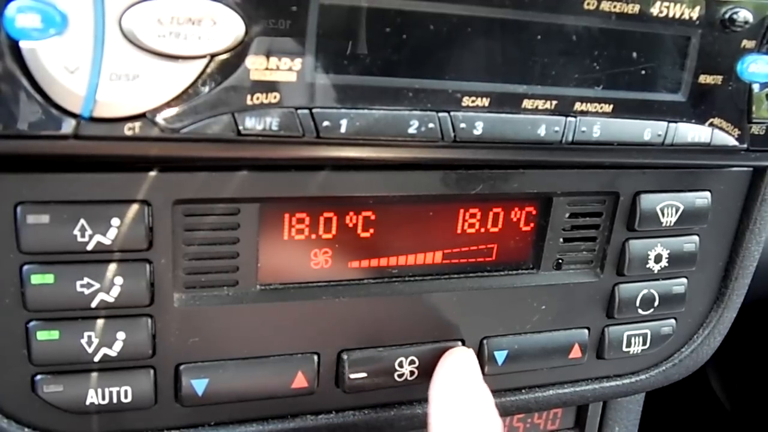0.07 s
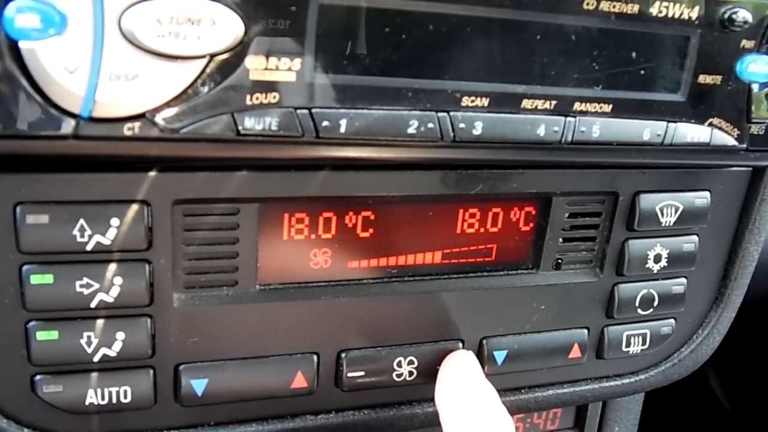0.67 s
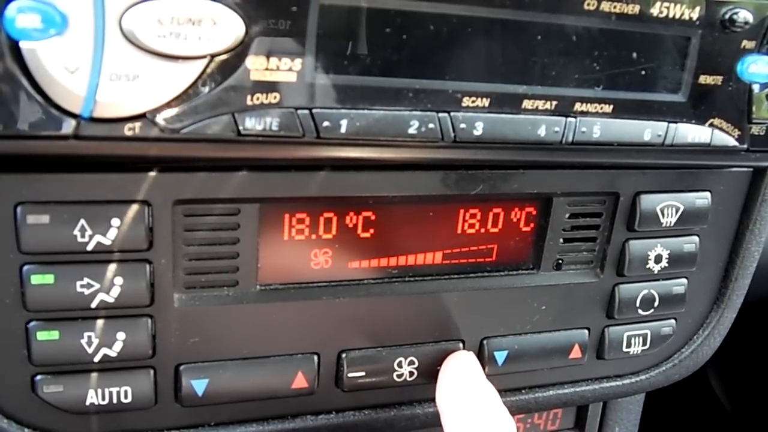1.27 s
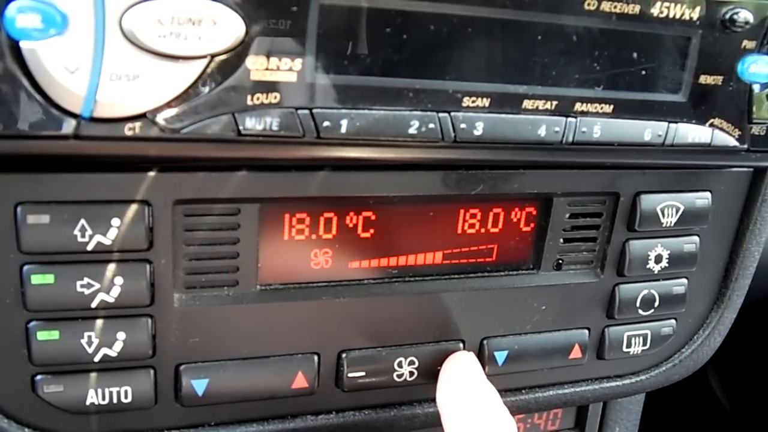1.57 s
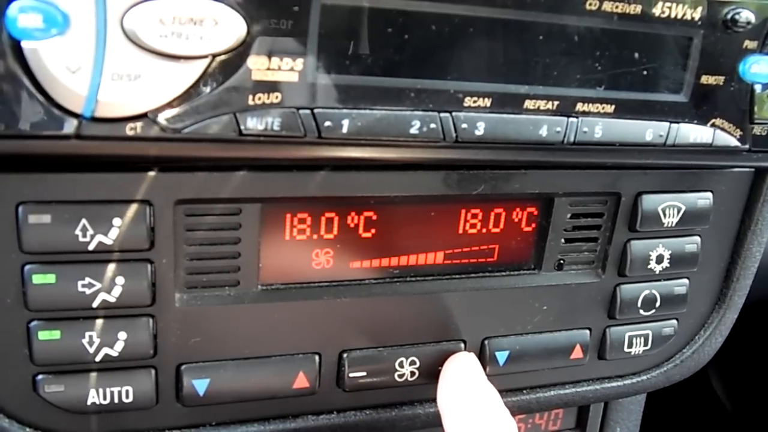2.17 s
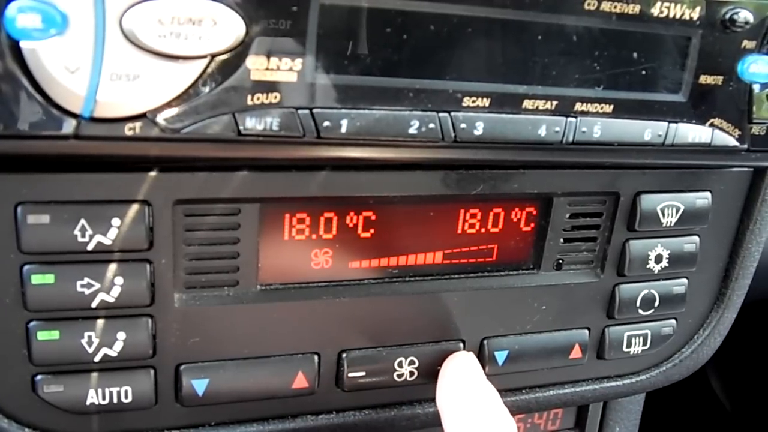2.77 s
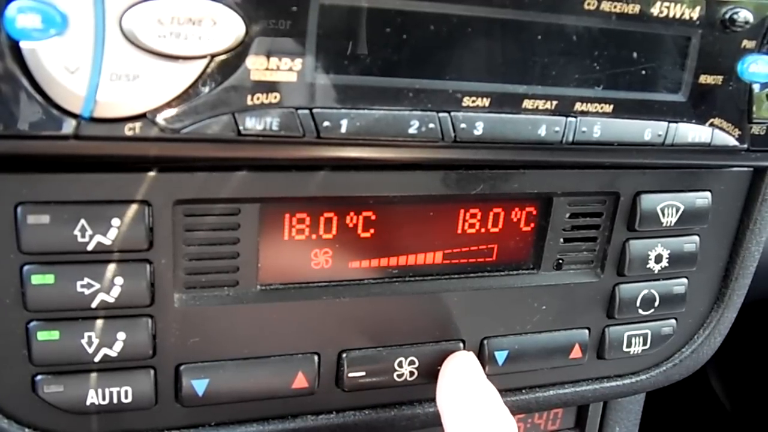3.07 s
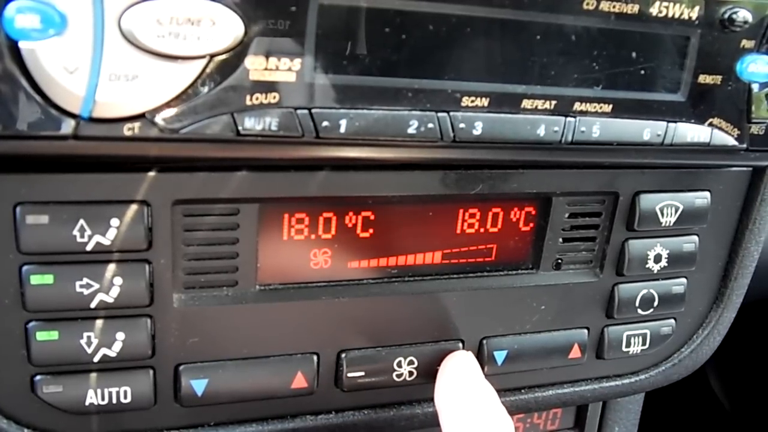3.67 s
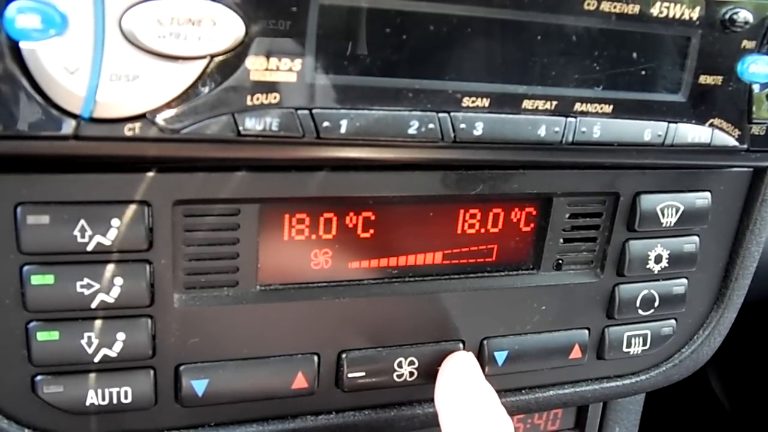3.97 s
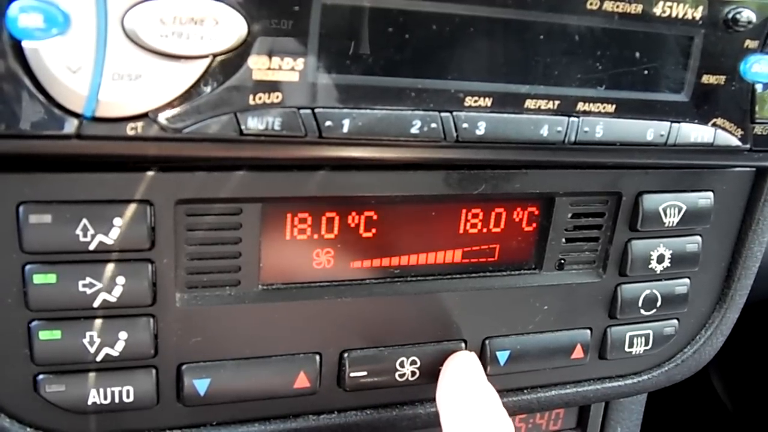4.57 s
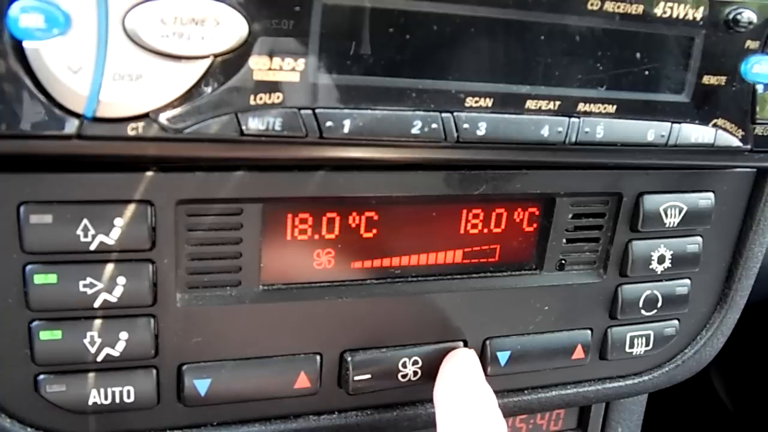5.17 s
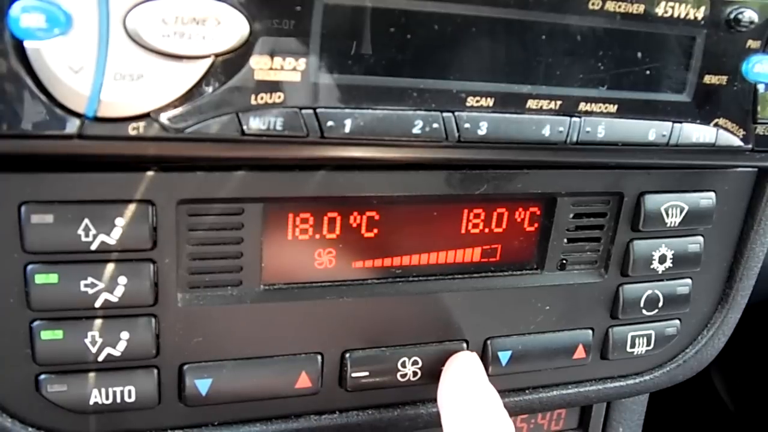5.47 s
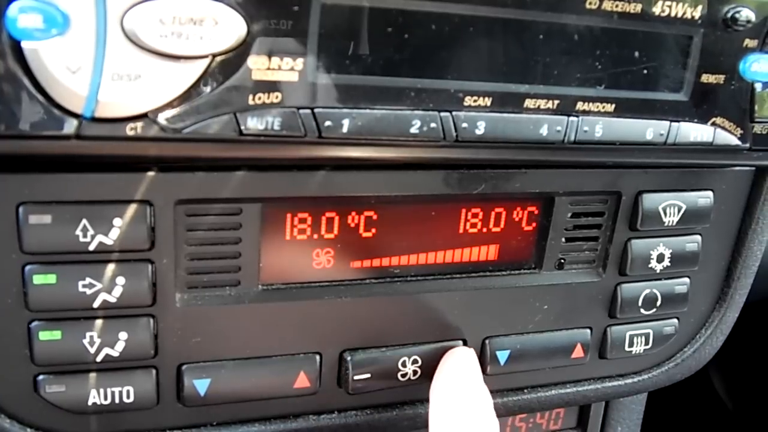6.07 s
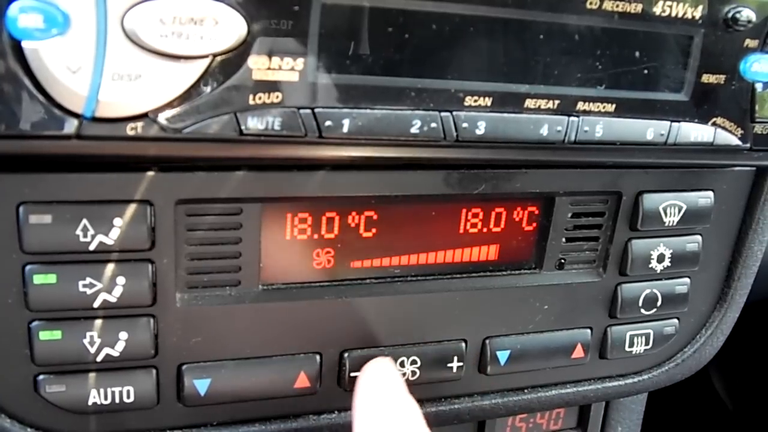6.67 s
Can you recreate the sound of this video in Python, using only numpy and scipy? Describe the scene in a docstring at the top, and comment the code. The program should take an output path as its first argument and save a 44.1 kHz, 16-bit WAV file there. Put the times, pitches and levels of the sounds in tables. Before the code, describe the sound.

A car's blower fan runs throughout, a steady, slightly hollow rush of air from the dashboard vents, heard close up in the cabin. A low rumble lies underneath, and the draught buffets the microphone with irregular soft thumps and flutter, mostly on the right. A small plastic button clicks down and up right at the start, at 0 and 0.2 seconds. One sharp, high plastic tick comes at about 1.9 seconds. From around 3.5 seconds a very faint fan tone sits in the air noise, rising slightly. The button is pressed and released three more times, at about 4.4, 5.2 and 6.1 seconds, each a pair of short, light clicks. Toward the end the air becomes a little thinner and hissier, and it keeps blowing and buffeting until the sound ends at nearly 7 seconds.

```python
"""Car blower stepped up

Inside a car a finger steps up the blower on the climate panel, close to a handheld camera.
Turbulent air from the vents excites the resonances of ducts and cabin, and the fan's faint blade
tone rises with its speed. The jet buffets the right microphone port over a low rumble.
The rocker button clicks, and a bit of hard plastic ticks once: impacts that ring damped modes."""
import sys
import numpy as np
from scipy import signal
from scipy.fft import rfft, irfft
from scipy.io import wavfile
from scipy.ndimage import uniform_filter1d

SR = 44100
rng = np.random.default_rng(int(sys.argv[2]) if len(sys.argv) > 2 else 0)


def transcribe(signal):
    """Save signal, clipped to [-1, 1], as a 16-bit WAV file at the path in sys.argv[1]."""
    frames = np.atleast_2d(signal).T
    limited = np.clip(frames, -1, 1)
    pcm = np.round(limited * 32767).astype(np.int16)
    wavfile.write(sys.argv[1], SR, pcm)


N = 300762
TIME = np.arange(N) / SR
FREQ = np.maximum(np.arange(N // 2 + 1) * SR / N, 1)


def undb(db):
    """Amplitude ratio of a level in decibels."""
    return 10 ** (np.asarray(db) / 20)


def curves(table):
    """Linear interpolation of each column of a time table."""
    times, *columns = np.transpose(table)
    return [np.interp(TIME, times, column) for column in columns]


def add(track, onset_s, sound):
    """Superposition of a short sound on a track."""
    start = int(onset_s * SR)
    a, b = max(start, 0), min(start + sound.shape[-1], N)
    if b > a:
        track[..., a:b] += sound[..., a - start:b - start]


def wander(rate_hz):
    """Sample-and-hold noise, smoothed twice; its standard deviation is near 1."""
    hold = int(SR / rate_hz)
    steps = rng.standard_normal(N)[np.arange(N) // hold]
    return 1.18 * uniform_filter1d(uniform_filter1d(steps, hold), hold)


def decay(t, t60):
    """Exponential damping: 60 dB in t60 seconds."""
    return np.exp(-np.log(1000) * t / t60)


def port_noise(spectrum, lift_db=0, lag_ms=0):
    """Partial coherence: two ports share part of a coloured noise, which may reach the right later."""
    hz, *columns = np.transpose(spectrum)
    left_db, right_db, coherence = (np.interp(np.log(FREQ), np.log(hz), c) for c in columns)
    coherence = np.clip(coherence, 0, 1)
    shared, own = rfft(rng.standard_normal((2, N))) * np.sqrt(SR / 2)
    delay = np.exp(-2j * np.pi * FREQ * lag_ms / 1000)
    right = coherence * shared * delay + np.sqrt(1 - coherence ** 2) * own
    return irfft(np.array([shared, right]) * undb(np.array([left_db, right_db]) + lift_db), N)


# Spectrum of the rushing air: f/Hz, left level/dB, right level/dB, coherence (0-1)
RUSH_SPECTRUM = [(200, -89.5, -89.5, 0.73), (622, -100, -98, 0.88), (955, -99.5, -93.5, 0.26),
                 (1720, -97.5, -94.5, 0.97), (2170, -99, -96.5, 0.17), (2430, -99, -96, 0.87),
                 (3046, -102, -104, 0.07), (4200, -108, -109.5, 0.4), (4850, -108, -113, 0),
                 (6200, -111, -114, 0.07), (7730, -111, -115.5, 0.26), (8530, -116, -117.3, .05),
                 (9700, -117, -117.5, 0.9)]
# Standing waves of ducts and cabin:
# f/Hz, bandwidth/Hz, left gain/dB, right gain/dB, further gain at full fan speed/dB
CABIN_MODES = [(406, 110, 7.5, 3.5, 0), (515, 70, 7.5, 1, 0), (680, 110, 6.5, 7, -2.5),
               (774, 68, 8.5, 2, -1), (900, 80, 6.5, 2, 2), (978, 56, 6, 4.5, 2.5), (1037, 70, 9, -1, 0),
               (1110, 80, 2.5, 5, 0), (1180, 75, 10, 0, 0), (1280, 110, 1.5, 0, -4), (1345, 60, 7, -1, 1.5),
               (1415, 70, 5.5, 3, 2.5), (1520, 85, 7.5, 5, 0), (1610, 90, 7, 4, 0), (1730, 110, 3.5, 7, 0),
               (1830, 60, 4, 2, 1), (1920, 90, 1, -1, 2.5), (2070, 140, -1, 0, 0), (2230, 60, 2, 0, 0),
               (2450, 120, 8.5, 6, 0), (2570, 110, 0, 3, 1), (2700, 90, 4, 1.5, 0),
               (2795, 60, -2.5, -3, 1.5), (2950, 100, 1.5, 0, 1.5), (3340, 130, -1, -1.5, 0),
               (3500, 160, 2.5, 1.5, 3), (4750, 500, 1.5, 0, -1), (5550, 150, 2, 1, 0),
               (6450, 150, 3, 0, 0), (7000, 140, 2.5, 1, 0), (9850, 160, 2, 0, 0)]


def vent_rush(blade_hz, hiss_db, roar_db, split_hz=600, flutter_db=0.43):
    """Resonance: broadband turbulence is coloured by the standing waves of ducts and cabin."""
    left_db, right_db, further_db = sum(
        np.outer(gains_db, np.exp(-np.log(2) * (2 * (FREQ - hz) / width) ** 2))
        for hz, width, *gains_db in CABIN_MODES)
    slow_air = port_noise(RUSH_SPECTRUM, np.array([left_db, right_db]), lag_ms=0.075)
    fast_air = irfft(rfft(slow_air) * undb(further_db), N)
    fast_share = (blade_hz / blade_hz.max()) ** 22  # comes in steeply near full speed
    air = (1 - fast_share) * slow_air + fast_share * fast_air
    roar = irfft(rfft(air) / (1 + (FREQ / split_hz) ** 8), N)
    hiss = air - roar
    return roar * undb(roar_db + flutter_db * wander(14)) + hiss * undb(hiss_db + flutter_db * wander(7.4))


def blade_tone(blade_hz, level_db, third_db=-10, right_db=-1, waver_db=1.5, wobble=0.0012):
    """Periodic forcing: the blades sound a thin tone at their passing rate, and its third harmonic."""
    phase = 2 * np.pi * np.cumsum(blade_hz * (1 + wobble * wander(14))) / SR
    fundamental = np.sin(phase) * undb(waver_db * wander(12))
    third = np.sin(3 * phase) * undb(third_db + waver_db * wander(5.9))
    return np.sqrt(2) * np.outer(undb([0, right_db]), (fundamental + third) * undb(level_db))


# Course of the fan: t/s, blade-passing f/Hz, vent hiss gain/dB, duct roar gain/dB, tone level/dB
FAN_COURSE = [(0, 405, -1.5, -2, -80), (.5, 421, -1, 0, -77), (1.8, 438, 0.24, 2.5, -80),
              (3.1, 447, 0, .8, -78), (3.5, 449.5, 0.5, 2.1, -71.3), (4.5, 457, 0.7, .3, -70.7),
              (5.6, 461, 0.9, -1, -70), (6.1, 459.5, 1, -3.5, -70.5), (6.82, 455, 0.6, -4, -70)]


def blower():
    """Fan noise is broadband plus tonal; as the fan speeds up, the weight moves from roar to hiss."""
    blade_hz, hiss_db, roar_db, tone_db = curves(FAN_COURSE)
    return vent_rush(blade_hz, hiss_db, roar_db) + blade_tone(blade_hz, tone_db)


# Draught on the right port between gusts: t/s, level/dB
DRAUGHT_LEVELS = [(0, -53), (.9, -47), (1.7, -51.5), (2.2, -47), (3.6, -49.5), (4.1, -48), (4.6, -50),
                  (6.82, -51)]
# Gusts from the vent at that port: crest t/s, level/dB, duration/s
VENT_GUSTS = [(0.13, -44.5, 0.027), (0.252, -45, 0.043), (0.562, -45, 0.036), (0.937, -44, 0.033),
              (1.073, -44.5, 0.031), (1.26, -43, 0.026), (2.004, -45.5, 0.013), (2.93, -44, 0.097),
              (3.24, -40.5, 0.041), (3.357, -41, 0.038), (3.508, -41.5, 0.039), (3.78, -44, 0.072),
              (4.271, -39, 0.042), (4.71, -46, 0.035), (5.015, -38, 0.073), (5.171, -47, 0.029),
              (5.375, -43, 0.052), (5.581, -41.5, 0.031), (5.927, -44.5, 0.039), (6.258, -38, 0.032),
              (6.407, -47, 0.072), (6.699, -39.5, 0.027)]


def jet_level(lull_db=5.0, swing_hz=26):
    """Addition of powers: bell-shaped gusts on a draught that dips as it swings off the port; in dB."""
    draught_db, = curves(DRAUGHT_LEVELS)
    power = undb(draught_db - lull_db * wander(swing_hz) ** 2) ** 2
    for crest_s, db, duration in VENT_GUSTS:
        power += undb(db) ** 2 * np.exp(-np.pi * ((TIME - crest_s) / duration) ** 2)
    return 10 * np.log10(power)


# Spectrum of the low rumble: f/Hz, left level/dB, right level/dB, coherence (0-1)
RUMBLE_SPECTRUM = [(9.9, -101, -77, 0.4), (30, -86, -69, 0.1), (63, -73.5, -70, 0),
                   (130, -85.5, -69.5, 0.62), (175, -92, -76, 0.62), (205, -93.5, -82, 0.93),
                   (244, -100, -98, 1), (390, -108, -108, 0), (940, -135, -135, 0.4)]


def rumble(jet_db, depth=0.54, waver_db=1.7):
    """Amplitude modulation: low noise on both ports wavers, and partly rises and falls with the jet."""
    push = undb(jet_db) / np.sqrt(np.mean(undb(jet_db) ** 2))
    return port_noise(RUMBLE_SPECTRUM) * undb(waver_db * wander(7.6)) * (1 - depth + depth * push)


def add_eddy(track, centre_s, db, hz, phase_turns, half_s=0.025, smoothness=3.16):
    """Vortex convection: one pressure swing at a port, higher for a small, fast eddy; phase skews it."""
    t = np.arange(-half_s, half_s, 1 / SR)
    bearing = np.arctan(2 * np.pi * hz * t / smoothness)
    swing = np.cos(bearing) ** smoothness * np.cos(smoothness * bearing + 2 * np.pi * phase_turns)
    taper = 1 - (t / half_s) ** 2
    add(track, centre_s - half_s, undb(db) * swing * taper)


# The strongest eddies, heard as single thumps: t/s, level/dB, f/Hz
STRONG_EDDIES = [(0.158, -33.5, 165), (0.273, -35.5, 159), (0.413, -32.5, 128), (0.426, -31, 137),
                 (0.558, -34, 156), (0.647, -31, 172), (0.696, -38.5, 190), (0.723, -28.5, 184),
                 (0.79, -31, 170), (0.827, -33.5, 160), (0.916, -32, 110), (1.044, -29.5, 280),
                 (1.171, -30.5, 130), (1.232, -32, 163), (1.279, -31.5, 180), (1.364, -30, 202),
                 (1.391, -34, 130), (1.49, -33, 159), (1.596, -30, 153), (1.634, -25.5, 205),
                 (1.673, -35, 169), (1.735, -31.5, 221), (1.825, -31, 191), (1.943, -30.5, 218),
                 (1.963, -30, 119), (2.039, -23.5, 258), (2.091, -30, 124), (2.139, -34, 150),
                 (2.195, -33.5, 156), (2.268, -32.5, 130), (2.307, -26, 259), (2.346, -33, 150),
                 (2.378, -24.5, 281), (2.393, -30.5, 210), (2.419, -35, 150), (2.475, -30, 130),
                 (2.536, -31.5, 230), (2.575, -30.5, 172), (2.675, -35, 131), (2.738, -30.5, 131),
                 (2.761, -29.5, 184), (3.033, -31.5, 166), (3.155, -29.5, 185), (3.281, -33, 190),
                 (3.365, -35, 212), (3.461, -30.5, 195), (3.569, -35, 150), (3.789, -32.5, 125),
                 (3.853, -29.5, 210), (3.933, -35, 250), (4.014, -31, 201), (4.078, -29, 135),
                 (4.125, -27.5, 255), (4.142, -28, 373), (4.185, -30, 201), (4.279, -31, 220),
                 (4.3, -29, 225), (4.441, -27.5, 265), (4.46, -32, 246), (4.712, -29, 190),
                 (5.001, -27, 385), (5.031, -23.5, 244), (5.595, -31, 130), (5.783, -28, 159),
                 (5.864, -26.5, 190), (5.939, -31, 156), (6.244, -31, 200), (6.269, -31, 167),
                 (6.39, -28.5, 156), (6.719, -32, 137)]


def buffeting(jet_db, eddy_hz=168, highest_hz=300, spread_octaves=0.52, count=1100, lee_db=-19):
    """Pseudo-sound: eddies beat on the right port; the left, in the lee, meets weak ones of its own."""
    # a faster jet carries the eddies past sooner, so they sound higher
    passing_hz = eddy_hz * 2 ** (0.029 * (jet_db - np.median(jet_db)))
    swirl, thumps = np.zeros((2, N)), np.zeros(N)
    for port in swirl:
        placings, scatters = rng.random((count, 2)), rng.standard_normal((count, 2))
        for (when, phase_turns), (pitch, weakness) in zip(placings, scatters):
            hz = min(passing_hz[int(when * N)] * 2 ** (spread_octaves * pitch), highest_hz)
            add_eddy(port, when * N / SR, -0.5 * weakness, hz, phase_turns)
    # a strong eddy hits head on: a push, then suction
    for centre_s, db, hz in STRONG_EDDIES:
        add_eddy(thumps, centre_s, db, hz, phase_turns=0.25 + 0.12 * rng.standard_normal())
    left, right = swirl / np.std(swirl) * undb(jet_db - 0.84)
    return np.array([left * undb(lee_db), right + thumps])


def reflections(sound, level_db=-6, t60=0.04):
    """Diffuse scattering: dashboard and glass return a short tail."""
    t = np.arange(sound.shape[1]) / SR
    response = rng.standard_normal(sound.shape) * decay(t, t60)
    response /= np.linalg.norm(response, axis=1, keepdims=True)
    return undb(level_db) * signal.fftconvolve(response, sound, axes=1)[:, :len(t)]


def snaps(events, modes, crack_db, seat_db, seat_s, right_db, contact_s, diffuse_hz=9000):
    """Impact excitation: a snap cracks and rings the modes near its centre, again as the part seats."""
    out, t = np.zeros((2, N)), np.arange(SR // 10) / SR
    hz, mode_db, t60 = np.transpose(modes)[:, :, None]
    polarity = (-1) ** np.arange(len(hz))[:, None]
    attack = np.minimum(t / contact_s, 1)
    for onset_s, db, centre_hz, octaves, *_ in events:
        drive = polarity * undb(mode_db) / (1 + (np.log2(hz / centre_hz) / octaves) ** 2)
        drive /= np.linalg.norm(drive)
        for delay_s, blow_db in (0, 0), (seat_s, seat_db):
            # low modes reach both ports in phase, high ones out of phase
            phase_turns = (rng.random((2, *hz.shape)) - 0.5) * hz / diffuse_hz
            ring = np.sum(drive * np.sin(2 * np.pi * (hz * t + phase_turns)) * decay(t, t60), axis=1)
            crack = undb(crack_db) * rng.standard_normal(len(t)) * decay(t, t60=0.014)
            snap = (ring + crack) * attack
            add(out, onset_s + delay_s, (snap + reflections(snap)) * undb(db + blow_db))
    return out * undb([[0], [right_db]])


# Button pressed and let go: t/s, level/dB, centre f/Hz, spread/octaves, panel knock level/dB
BUTTON_STROKES = [(.0082, -41, 2000, 1.5, -54), (.1893, -36.3, 2500, .35, -62),
                  (4.3485, -42.6, 1800, 1.6, -60), (4.485, -40.7, 1950, 2, -60),
                  (5.2176, -39.4, 2100, 1.5, -60), (5.3765, -50, 1780, 1.2, -64),
                  (6.1084, -36.8, 2250, 1.4, -52), (6.273, -41.5, 1600, 2.6, -53)]
# Modes of the button: f/Hz, level/dB, T60/s
BUTTON_MODES = [(950, -7, 0.025), (1410, -3.5, .02), (1580, -3, 0.02), (1830, 1, 0.021), (2000, -1.5, .017),
                (2520, -4, 0.013), (2780, -3, 0.013), (3020, -7, .014), (3480, -4.5, 0.02),
                (4200, -10, 0.012), (5050, -8, 0.012), (5600, -9, 0.012), (7200, -11, 0.011),
                (7950, -8, 0.01), (9200, -15, 0.008)]


def rocker_button(panel_hz=585, panel_t60=0.06):
    """Structural coupling: each stroke rings the button and knocks one low mode of the panel behind."""
    clicks = snaps(BUTTON_STROKES, BUTTON_MODES,
                   crack_db=-17, seat_db=-9, seat_s=0.0026, right_db=-5, contact_s=0.0005)
    knocks, t = np.zeros(N), np.arange(SR // 10) / SR
    knock = np.sin(2 * np.pi * panel_hz * t) * decay(t, panel_t60)
    for onset_s, *_, knock_db in BUTTON_STROKES:
        add(knocks, onset_s, undb(knock_db) * knock)
    return clicks + knocks


# One sharp tick of hard plastic: t/s, level/dB, centre f/Hz, spread/octaves
PLASTIC_SNAP = [(1.8626, -33.3, 7000, 3.4)]
# Modes of that plastic: f/Hz, level/dB, T60/s
PLASTIC_MODES = [(2980, -6, .025), (3330, -5, 0.025), (4030, -3.5, 0.028), (4420, 1.5, 0.02),
                 (5300, -10, .015), (5900, -4.5, 0.02), (6250, -6, .015), (7000, -8, 0.012),
                 (7880, 6, 0.02), (8500, -1.5, 0.012), (9050, -2, 0.01), (9700, 2, 0.011),
                 (11000, -4, .008)]


def plastic_tick():
    """Free vibration: a very brief contact rings the high, quickly damped modes of hard plastic."""
    return snaps(PLASTIC_SNAP, PLASTIC_MODES,
                 crack_db=-8, seat_db=-16, seat_s=0.0048, right_db=-8, contact_s=0.0003)


def scene():
    """Superposition of blower, rumble, buffeting and clicks; one jet drives rumble and buffeting."""
    jet_db = jet_level()
    clicks = rocker_button() + plastic_tick()
    return blower() + rumble(jet_db) + buffeting(jet_db) + clicks


def record(dry, rolloff_hz=10400, cutoff_hz=11700):
    """Band limiting: the camera rolls off the top treble, then cuts it."""
    softened = signal.sosfilt(signal.butter(16, rolloff_hz, fs=SR, output="sos"), dry)
    return signal.sosfilt(signal.ellip(10, 0.2, 70, cutoff_hz, fs=SR, output="sos"), softened)


dry = scene()
out = record(dry)
transcribe(out)
```